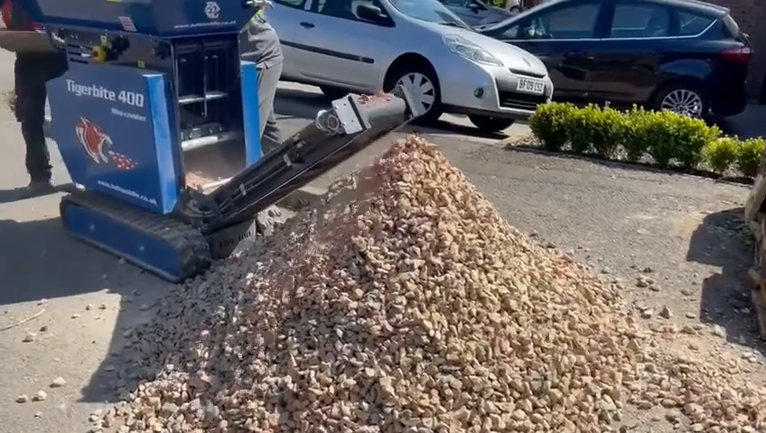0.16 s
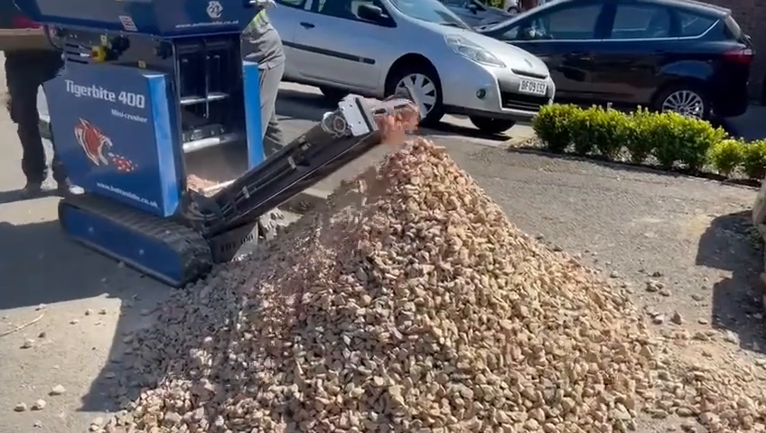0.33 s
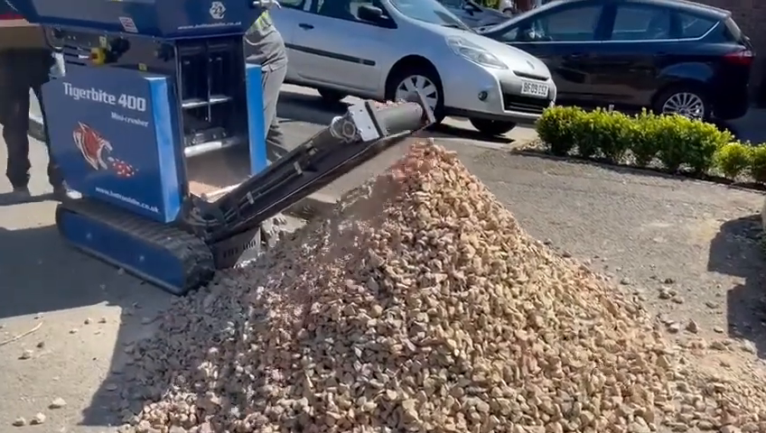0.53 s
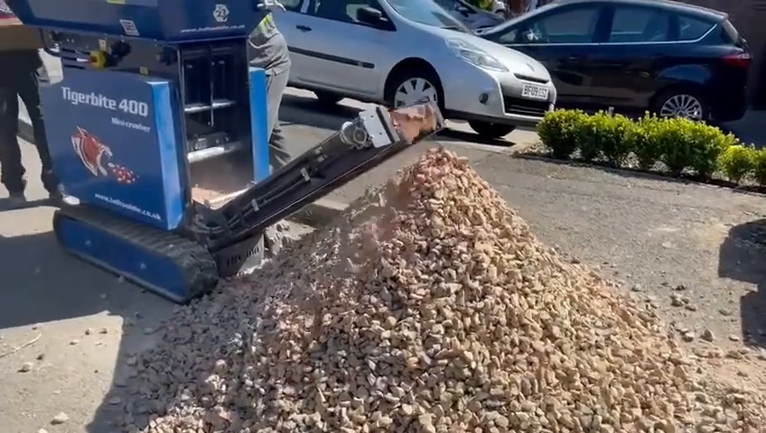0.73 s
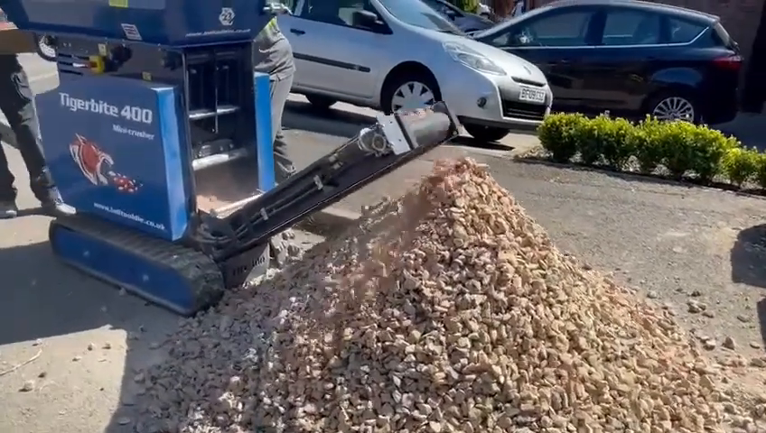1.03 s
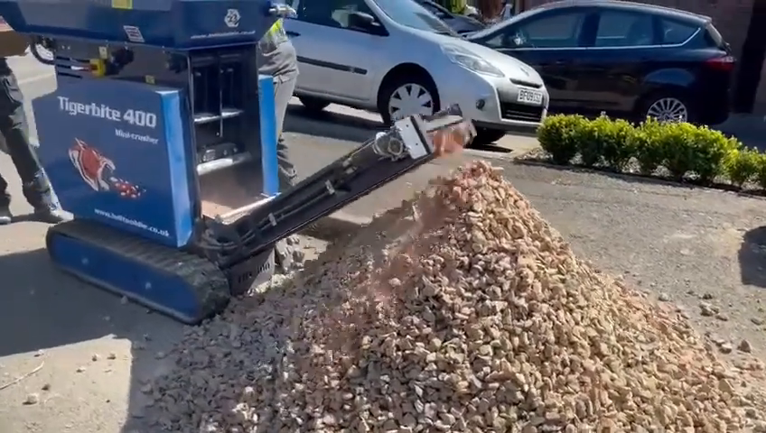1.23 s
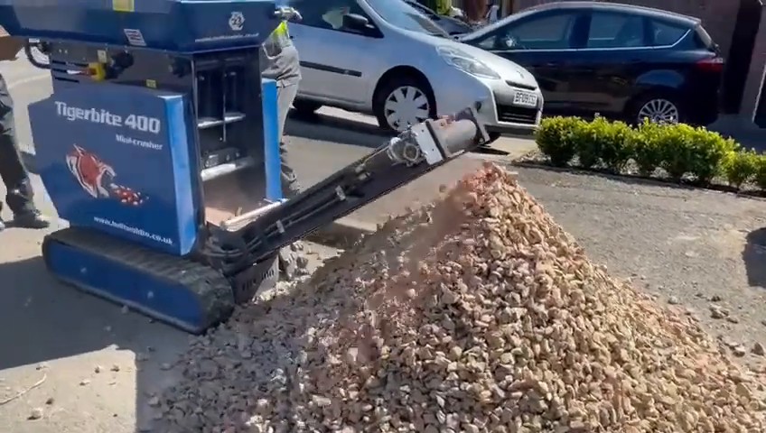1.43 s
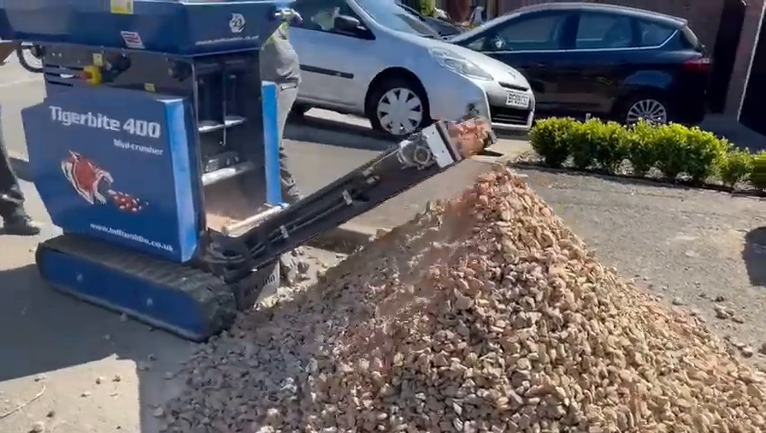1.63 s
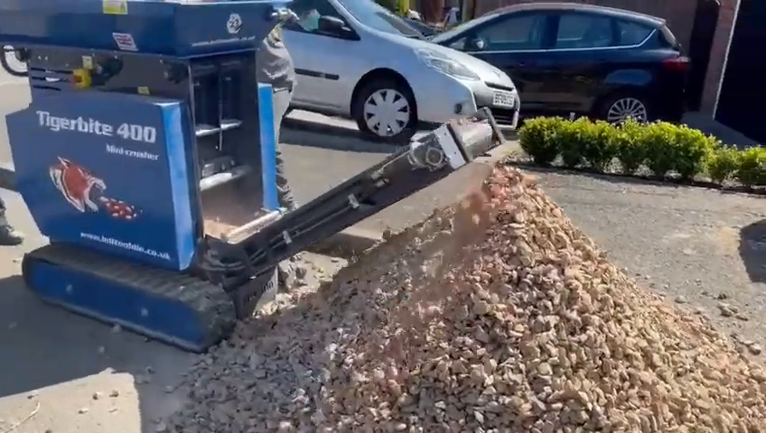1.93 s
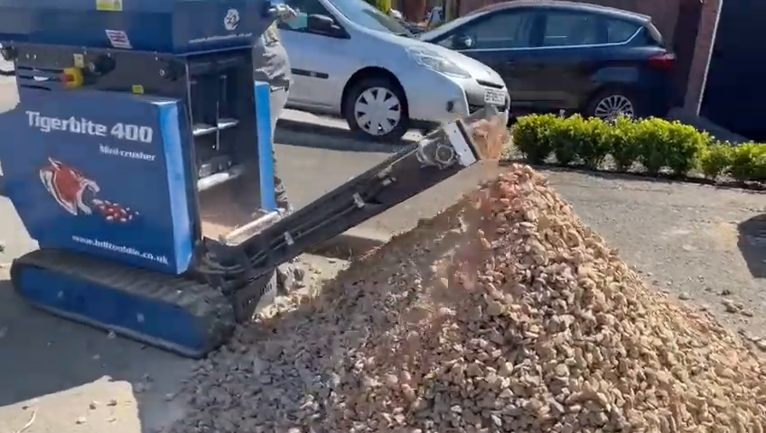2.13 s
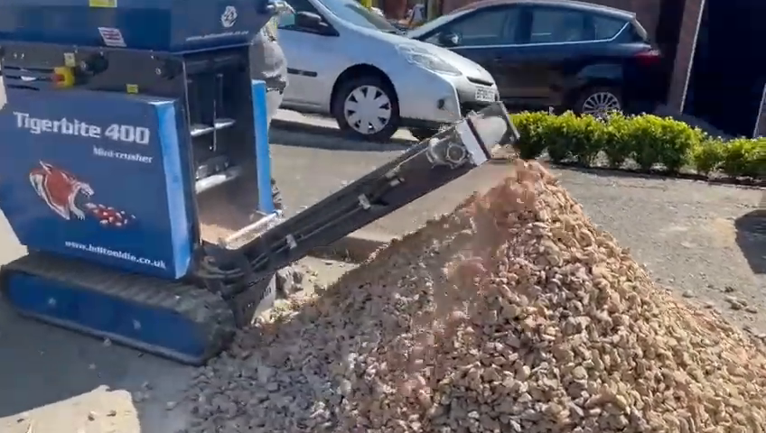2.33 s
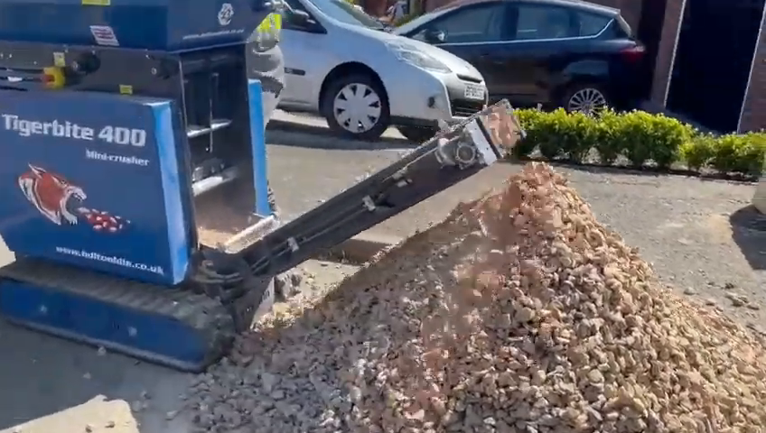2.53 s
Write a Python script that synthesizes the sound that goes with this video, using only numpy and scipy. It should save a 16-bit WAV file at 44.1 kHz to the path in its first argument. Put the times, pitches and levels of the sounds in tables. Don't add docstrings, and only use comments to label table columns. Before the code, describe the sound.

A loud droning crusher engine with rattling jaw, stones thumping in steel and chips falling

```python
import sys
import numpy as np
from scipy import signal
from scipy.fft import rfft, irfft, next_fast_len
from scipy.io import wavfile
from scipy.ndimage import uniform_filter1d, map_coordinates

SR = 44100
rng = np.random.default_rng(int(sys.argv[2]) if len(sys.argv) > 2 else 0)


def put_to_file(sound):
    columns = np.atleast_2d(sound).T
    safe = np.clip(columns, -1, 1)
    whole_steps = np.round(safe * 32767)
    wavfile.write(sys.argv[1], SR, whole_steps.astype(np.int16))


def boost_factor(decibels):
    exponent = np.asarray(decibels, float) / 20
    return 10 ** exponent


N = 118188
T = np.arange(N) / SR

# time in seconds, crank speed in Hz.
CRANK_HZ = [(0, 52.79), (.4, 52.9), (.6, 52.73), (.8, 52.75), (1.0, 52.48), (1.4, 52.52), (1.6, 52.73),
            (2.0, 52.57), (2.25, 52.61), (2.68, 52.99)]
# time in seconds, gain in dB.
LOAD_DB = [(0, -1.5), (.4, -0.4), (.8, -.5), (1.2, 0.8), (1.6, 0.5), (2.0, 1), (2.3, 1), (2.68, 1)]
# multiple of the cycle rate, level in dB rms.
EXHAUST_ORDERS = [(2, -25), (3, -28), (4, -27.5), (5, -34.5), (6, -31.5)]
# multiple of the cycle rate, level in dB rms.
CASING_ORDERS = [(7, -34.5), (8, -29), (9, -30.5), (10, -30.5), (11, -38.5), (12, -42.5), (13, -46),
                 (14, -37), (15, -44)]
# multiple of the cycle rate, level in dB rms.
WHINE_ORDERS = [(17, -39), (20, -37.5), (25, -42), (26, -41), (30, -37.5), (60, -46)]
# frequency in Hz, level in dB per Hz.
ROAR_SPECTRUM = [(30, -11), (120, -2.5), (165, -6), (285, -2), (400, -8.5), (850, -9.5), (1700, -15.5),
                 (1900, -24.5)]
# frequency in Hz, level in dB per Hz.
HISS_SPECTRUM = [(1900, 0), (2800, 0), (4300, -4), (6000, -4.5), (7200, -8), (8400, -4), (10300, -3),
                 (11500, -9.5)]
# start in seconds, peak in dB, chip pitch in Hz.
SHOWERS = [(0.0397, -19.5, 5840), (0.107, -25, 4900), (0.1844, -23, 4900), (0.2804, -21.5, 2870),
           (0.356, -18, 2840), (0.4522, -22, 2810), (0.4996, -19.5, 2850), (0.5374, -16, 5900),
           (0.6224, -20, 4000), (0.7177, -24, 2880), (0.7912, -21, 2920), (0.8795, -17.5, 2800),
           (0.9817, -19.5, 3030), (1.062, -17, 3640), (1.1374, -19.5, 2660), (1.2054, -24, 2740),
           (1.2594, -24, 2560), (1.3316, -21, 2540), (1.4064, -21, 2810), (1.4334, -21, 3300),
           (1.5194, -22.5, 4170), (1.5694, -21, 2970), (1.5991, -18, 3320), (1.6796, -21.5, 2520),
           (1.7864, -21.5, 2530), (1.821, -20, 2940), (1.8607, -21.5, 2510), (1.8994, -20, 3360),
           (1.9544, -19, 2650), (2.0078, -19, 2550), (2.0472, -18, 2760), (2.1275, -20.5, 2570),
           (2.203, -17.5, 2660), (2.3252, -14.5, 3400), (2.3974, -26, 4080), (2.469, -18.5, 2740),
           (2.4938, -19, 3340), (2.5846, -24, 2970), (2.623, -21.5, 2760), (2.6466, -21, 2640)]
# start in seconds, level in dB, pitch in Hz, T60 in seconds.
TINKS = [(2.33, -25, 8600, 0.035), (2.331, -23.5, 3000, 0.039), (2.9, -25, 2950, 0.027),
         (2.328, -27, 5100, .02), (2.338, -27, 6100, .025), (1.7, -28, 3100, .03),
         (2.345, -21.5, 11300, 0.043), (1.061, -25, 4100, 0.018), (0.93, -26, 2600, .025),
         (1.3, -30, 2800, 0.034), (0.004, -12, 960, 0.05), (1.06, -7, 617, 0.034), (0.97, -14, 1050, .03),
         (1.061, -17, 1670, 0.024), (0.96, -21, 2450, .02), (0.42, -16.5, 850, 0.045),
         (.772, -17.5, 2000, .03), (.33, -17, 700, 0.041), (.41, -16, 800, 0.046)]
# start in seconds, peak in dB, ring in Hz.
THUMPS = [(0.168, -16, 276), (.245, -12, 257), (0.409, -11, 132), (.434, -13.5, 265), (.77, -16.5, 256),
          (.925, -13, 263.4), (.93, -15, 122), (0.846, -12.5, 272), (0.963, -19, 226), (1.061, -4.5, 279),
          (1.156, -6, 275), (1.194, -9, 269), (1.245, -9, 261), (1.304, -18, 223), (1.422, -4, 280.3),
          (1.684, -14, 216), (1.776, -5, 292), (1.834, -12.5, 266), (1.57, -15.5, 294), (2.021, -17, 238),
          (2.134, -11.5, 282), (2.27, -12.5, 291), (2.351, -16, 105), (2.101, -12, 276), (2.214, -16, 216),
          (2.37, -16, 248), (2.408, -15, 283), (2.442, -12.5, 208.5), (2.559, -15.5, 213),
          (2.634, -15.5, 206)]
# start in seconds, peak in dB, main ring in Hz.
CRACKS = [(0.007, -11, 927), (.231, -12, 787), (.27, -16.5, 690), (.391, -9, 775), (.44, -12, 790),
          (0.489, -15.5, 820), (0.796, -8.5, 514), (0.988, -10, 743), (1.062, -0.5, 868),
          (1.105, -9.5, 770), (1.589, -9.5, 515), (1.685, -7, 647), (1.774, -17, 710), (1.858, -9, 487),
          (1.927, -12.5, 790), (1.447, -14, 684), (2.038, -9.5, 600), (2.129, -11, 590), (2.194, -14, 815),
          (2.284, -9, 828), (2.489, -11, 875), (2.651, -16, 890)]
# ratio to the main ring, level in dB, T60 in seconds.
PLATE_MODES = [(.45, -0.5, 0.043), (.64, -0.5, 0.047), (.82, -3.5, 0.04), (1.01, -1.5, .035),
               (1.23, -9.5, 0.041), (1.5, -3.5, 0.029), (1.8, -13.5, 0.037), (2.3, -27, 0.03),
               (2.9, -12, 0.047), (3.5, -21, 0.014), (4.2, -15, 0.037)]
# frequency in Hz, ratio in dB.
WIDTH_LOW_DB = [(200, -28.5), (500, -21.5), (1000, -6), (1800, 0.5), (2100, 2.5), (2700, -5.5),
                (3900, -0.5), (4500, -8)]
# frequency in Hz, ratio in dB.
WIDTH_HIGH_DB = [(4500, -0.35), (6400, 1), (7900, 3.5), (8550, -10), (9300, 10.5), (10250, 25), (11200, 1),
                 (11550, -12)]
# frequency in Hz, share from 0 to 1.
SIDE_SHARE = [(200, 0.1), (1200, 1), (1750, 0.17), (2100, 0.24), (2900, .78), (4300, .25), (7800, 0.54),
              (9300, 0.49)]
# frequency in Hz, lead in radians.
SIDE_LEAD_RAD = [(1750, 1.48), (2100, 0.02), (2800, 0.5), (4100, 0.9), (5000, -0.12), (8200, 1.2),
                 (8900, -1.5), (10000, -1)]
# frequency in Hz, level in dB per bin.
FLOOR_DB = [(300, -62.5), (1600, -67.5), (1950, -57.5), (2400, -71), (4000, -69.5), (6400, -67.5),
            (8600, -70.5), (11300, -65)]
# frequency in Hz, step below the louder channel in dB.
STEP_BELOW_DB = [(200, 24), (800, 18), (1600, 12), (2000, 7), (2900, 10.5), (5500, 6.5), (10300, 9),
                 (11500, -1)]

EXHAUST_RAD, EXHAUST_TURN_RAD, CASING_RAD, CASING_TURN_RAD = -.48, 0.91, 2.55, 1.87
UNEVEN_DB, UNEVEN_RAD = .5, .05
WHINE_UNEVEN_DB, WHINE_UNEVEN_RAD = 1.5, .45
SHAKE_HZ = 11.26
ROAR_DB, ROAR_FIRING_DB, ROAR_SHAKE_DB, ROAR_PATCH_DB, ROAR_LAG = -20, 0.68, 0.9, 0.9, 0.04
HISS_DB, HISS_FIRING_DB, HISS_SHAKE_DB, HISS_PATCH_DB, HISS_LAG = -31.5, 0.63, 1.15, 1.12, 0.27
JOSTLE_DB, JOSTLE_HZ, JOSTLE_T60_S = -21, 265, 0.072
CHATTER_DB, CHATTER_HZ, CHATTER_T60_S = -24, 770, .06
SHUDDER_DB = -39.5
SHOWER_DB, SHOWER_S, TRICKLE_DB = -12.5, .01, -39
CHIP_HZ, CHIP_SPREAD, CHIP_CYCLES, CHIP_SIZE_DB = 4504, .5, 3.5, 3
CHIP_LIFT = 1.35
CRUNCH_DB, CRUNCH_T60_S, CRUNCH_RISE_S = -9.5, 0.065, 0.0012
THUMP_DB, THUMP_RISE_S, THUMP_T60_S = 8, 0.009, 0.074
CRACK_DB = -12.5
FLOOR_WANDER_DB, FLOOR_FOLLOWS = 1.06, 0.86
TOP_HZ = 11690
CLIP_TOP = 1.0


def unit(x):
    return x / np.sqrt(np.mean(x ** 2) + 1e-20)


def along(points, hz):
    f, v = np.transpose(points)
    return np.interp(np.log(hz + 1), np.log(f + 1), v)


def wobble(rate_hz):
    knots = rng.standard_normal(int(N * rate_hz / SR) + 4)
    return map_coordinates(knots, [T * rate_hz])


def filtered(x, response):
    m = next_fast_len(N + 8192)
    return irfft(rfft(x, m) * response(np.fft.rfftfreq(m, 1 / SR)), m)[..., :N]


def rush(spectrum, patchy_db, gate_db):
    z = signal.stft(rng.standard_normal((2, N)), nperseg=512)[2]
    field = uniform_filter1d(rng.standard_normal(z.shape[1:]), size=5, axis=0)
    field = uniform_filter1d(field, size=6, axis=1)
    pair = signal.istft(z * boost_factor(patchy_db * unit(field)), nperseg=512)[1][:, :N]
    pair = pair * boost_factor(gate_db)
    closed = [(spectrum[0][0] / 2, -80)] + list(spectrum) + [(spectrum[-1][0] * 2, -80)]
    return unit(filtered(pair, lambda hz: boost_factor(along(closed, hz))))


def rings(start_s, hz, db, t60_s, rise_s, size):
    t = np.arange(size) / SR
    first = np.round(start_s * SR).astype(int).clip(0, N)
    at = (first[:, None] + np.arange(size)).ravel()
    shape = boost_factor(db[:, None] - 60 * t / t60_s[:, None]) * (1 - np.exp(-t / rise_s))
    channels = []
    for phase in (0 * hz, 2 * np.pi * rng.random(len(hz))):
        wave = shape * np.sin(2 * np.pi * hz[:, None] * t + phase[:, None])
        channels.append(np.bincount(at, wave.ravel(), N + size + 1)[:N])
    return np.array(channels)


def pulse_train(cycle, orders, angle_rad, turn_rad):
    total = 0
    for k, db in orders:
        drift = np.sqrt(min(k / 2 - .9, 9))
        phase = k * (cycle + angle_rad) + turn_rad
        phase = phase + UNEVEN_RAD * drift * (wobble(5.88) + wobble(20))
        level = np.sqrt(2) * boost_factor(db + UNEVEN_DB * drift * wobble(3.976))
        total = total + level * np.array([np.cos(phase), np.sin(phase)])
    return total


def whine(cycle):
    total = 0
    for k, db in WHINE_ORDERS:
        level = boost_factor(db + WHINE_UNEVEN_DB * wobble(8.78))
        total = total + level * np.exp(1j * (k * cycle + WHINE_UNEVEN_RAD * wobble(9.7)))
    return np.sqrt(2) * np.array([total.real, total.imag])


def jaw_shake(lag):
    return np.cos(2 * np.pi * (SHAKE_HZ * T - lag)) * (1 + 0.14 * wobble(5.2))


def engine():
    cycle = np.pi * np.cumsum(np.interp(T, *np.transpose(CRANK_HZ))) / SR
    exhaust = pulse_train(cycle, EXHAUST_ORDERS, EXHAUST_RAD, EXHAUST_TURN_RAD)
    casing = pulse_train(cycle, CASING_ORDERS, CASING_RAD, CASING_TURN_RAD)
    firing = np.cos(cycle - .9) + 0.28 * np.cos(3 * cycle - 2.1)
    roar_gate_db = ROAR_FIRING_DB * firing + ROAR_SHAKE_DB * jaw_shake(ROAR_LAG) + 0.3 * wobble(8.9)
    hiss_gate_db = HISS_FIRING_DB * firing + HISS_SHAKE_DB * jaw_shake(HISS_LAG) + 0.44 * wobble(14.31)
    roar = boost_factor(ROAR_DB) * rush(ROAR_SPECTRUM, ROAR_PATCH_DB, roar_gate_db)
    hiss = boost_factor(HISS_DB) * rush(HISS_SPECTRUM, HISS_PATCH_DB, hiss_gate_db)
    load = boost_factor(np.interp(T, *np.transpose(LOAD_DB)))
    return load * (exhaust + casing + whine(cycle) + roar + hiss)


def jostle(count=260):
    s, luck = rng.random(count) * N / SR, rng.standard_normal((count, 2))
    hum = rings(s, JOSTLE_HZ * (1 + .11 * luck[:, 0]), JOSTLE_DB + 2.9 * luck[:, 1],
                0 * s + JOSTLE_T60_S, THUMP_RISE_S, size=2560)
    s, luck = rng.random(count) * N / SR, rng.standard_normal((count, 2))
    chatter = rings(s, CHATTER_HZ * (1 + .09 * luck[:, 0]), CHATTER_DB + 3 * luck[:, 1],
                    0 * s + CHATTER_T60_S, .002, size=1536)
    shudder = boost_factor(SHUDDER_DB) * rush([(20, -3), (30, 7), (42, 1)], 1, 0)
    return hum + chatter + shudder


def rubble(count=45, trickle_count=3500):
    s, db, hz = np.repeat(np.transpose(SHOWERS), repeats=count, axis=1)
    s = np.append(s + SHOWER_S * rng.gamma(2, 1, len(s)), rng.random(trickle_count) * N / SR)
    db = np.append(db + SHOWER_DB, np.full(trickle_count, TRICKLE_DB))
    hz = np.append(CHIP_LIFT * hz, np.full(trickle_count, CHIP_HZ))
    hz = (hz * np.exp(CHIP_SPREAD * rng.standard_normal(len(s)))).clip(2000, 11300)
    size_db = CHIP_SIZE_DB * rng.exponential(1, len(s)).clip(0, 2.5)
    return rings(s, hz, db + size_db, 7 * CHIP_CYCLES / hz, .0001, size=256)


def tinks():
    s, db, hz, t60_s = np.transpose(TINKS)
    return rings(s, hz, db, t60_s, 0.00088, size=2048)


def crunch():
    blows = 0
    for s, db, _ in CRACKS:
        t = (T - s).clip(0)
        blows = blows + boost_factor(db - 60 * t / CRUNCH_T60_S) * (1 - np.exp(-t / CRUNCH_RISE_S))
    spectrum = [(300, -1.5), (1100, -2.0), (1900, -18.5), (3800, -22.5), (6000, -22)]
    return boost_factor(CRUNCH_DB) * blows * rush(spectrum, 0.96, 0)


def hopper_booms():
    s, db, hz = np.transpose(THUMPS)
    return rings(s, hz, db + THUMP_DB, 0 * s + THUMP_T60_S, THUMP_RISE_S, size=3072)


def hopper_cracks():
    s, db, main_hz = np.repeat(np.transpose(CRACKS), repeats=len(PLATE_MODES), axis=1)
    ratio, level_db, t60_s = np.tile(np.transpose(PLATE_MODES), reps=len(CRACKS))
    luck = rng.standard_normal((len(s), 3))
    hz = main_hz * ratio * (1 + 0.049 * luck[:, 0])
    db = db + level_db + CRACK_DB + 1.14 * luck[:, 1]
    return rings(s + 0.00197 * abs(luck[:, 2]), hz, db, t60_s, 0.0015, size=1536)


def scene():
    hits = hopper_booms() + hopper_cracks() + crunch()
    direct, scattered = engine() + jostle() + rubble() + tinks() + hits

    def wide(hz):
        return np.arctan(boost_factor(along(WIDTH_LOW_DB, hz) + along(WIDTH_HIGH_DB, hz)))

    def share(hz):
        return np.clip(along(SIDE_SHARE, hz), 0, 1)

    def lead(hz):
        return np.exp(1j * (along(SIDE_LEAD_RAD, hz) + np.pi * (hz > 10200)))

    mid = filtered(direct, lambda hz: np.cos(wide(hz)))
    side = filtered(direct, lambda hz: np.sin(wide(hz)) * share(hz) * lead(hz))
    side = side + filtered(scattered, lambda hz: np.sin(wide(hz)) * np.sqrt(1 - share(hz) ** 2))
    return np.array([mid + side, mid - side])


def thinned(x, size=1024, count=8, order=520):
    window = signal.windows.kaiser_bessel_derived(2 * size, 4 * np.pi)
    turns = np.outer(np.arange(2 * size) + (size + 1) / 2, np.arange(size) + .5)
    basis = np.cos(np.pi / size * turns) * window[:, None] * np.sqrt(2 / size)
    frames = N // size + 3
    pair = np.pad([x[0] + x[1], x[0] - x[1]], [(0, 0), (order + size, 4 * size)]) / 2
    at = size * np.arange(frames)[:, None] + np.arange(2 * size)
    z = (pair[:, at] @ basis).reshape(2, frames, -1, count)
    energy = (z ** 2).mean(axis=3)
    power = uniform_filter1d(energy, size=3, axis=1) * np.pi ** 2 / 16 / size
    band_hz = (np.arange(size // count) + .5) * count * SR / 2 / size
    hiss_db = 10 * np.log10(power[..., band_hz > 7000].mean(axis=(0, 2)) + 1e-20)[:, None]
    wander = unit(uniform_filter1d(rng.standard_normal(power.shape), size=3, axis=1))
    limit_db = along(FLOOR_DB, band_hz) + FLOOR_FOLLOWS * (hiss_db - np.median(hiss_db))
    limit_db = limit_db + FLOOR_WANDER_DB * wander
    loud = uniform_filter1d(energy.max(axis=0), size=5, axis=0)
    step = (np.sqrt(abs(loud)) * boost_factor(-along(STEP_BELOW_DB, band_hz)) + 1e-9)[..., None]
    z = np.sign(z) * np.floor((abs(z) / step) ** .75 + .4054) ** (4 / 3) * step
    z = z * ((power > boost_factor(2 * limit_db)) & (band_hz < TOP_HZ))[..., None]
    back = z.reshape(2, frames, size) @ basis.T
    joined = (back[:, 1:, :size] + back[:, :-1, size:]).reshape(2, -1)
    mid, side = joined[:, order:order + N]
    return np.array([mid + side, mid - side])


def top_cut(x):
    return signal.sosfilt(signal.butter(12, 11610, fs=SR, output="sos"), x)


def record(dry):
    soft = dry / (1 + abs(dry / CLIP_TOP) ** 4) ** (1 / 4)
    mix = thinned(soft)
    return top_cut(mix)


dry = scene()
out = record(dry)
put_to_file(out)
```